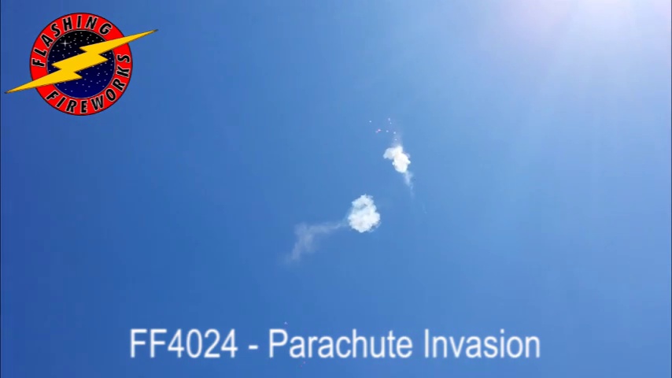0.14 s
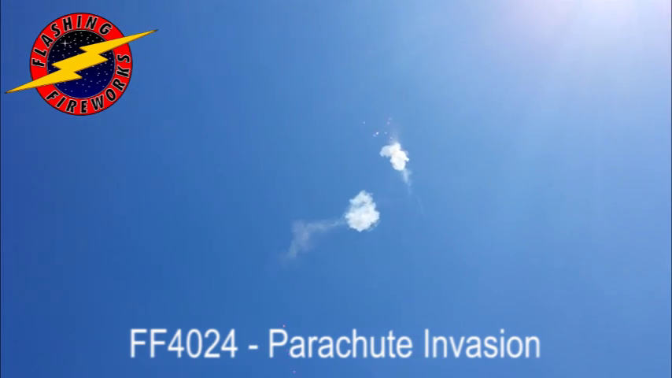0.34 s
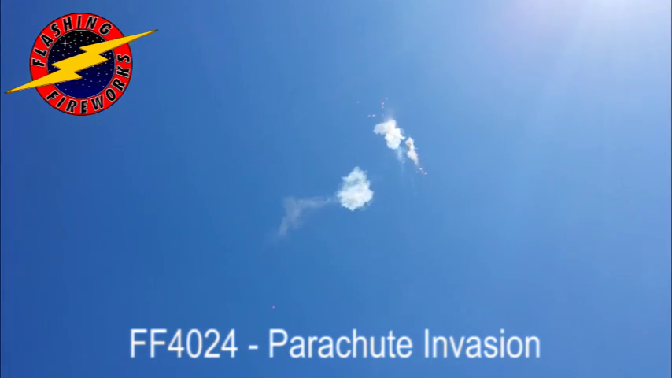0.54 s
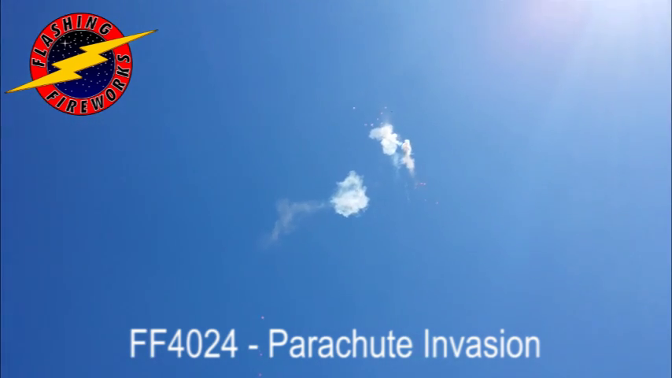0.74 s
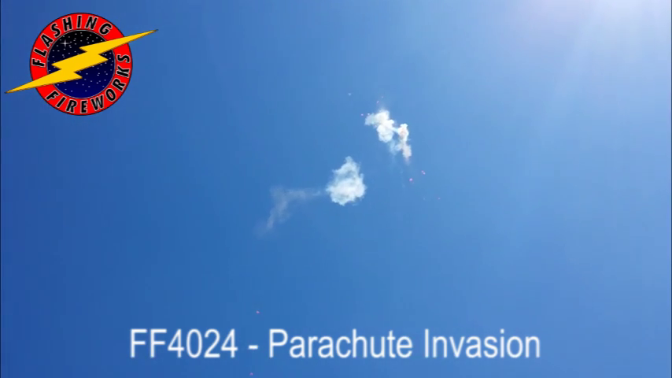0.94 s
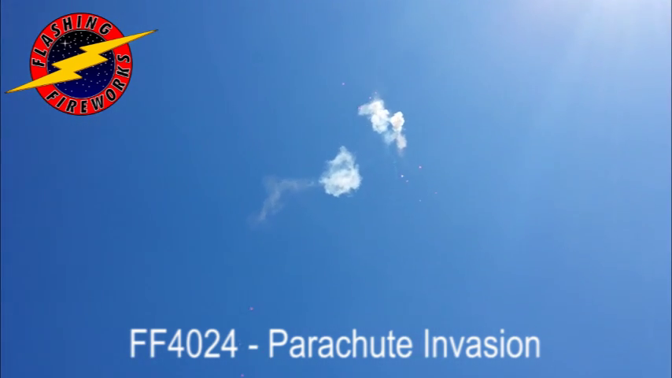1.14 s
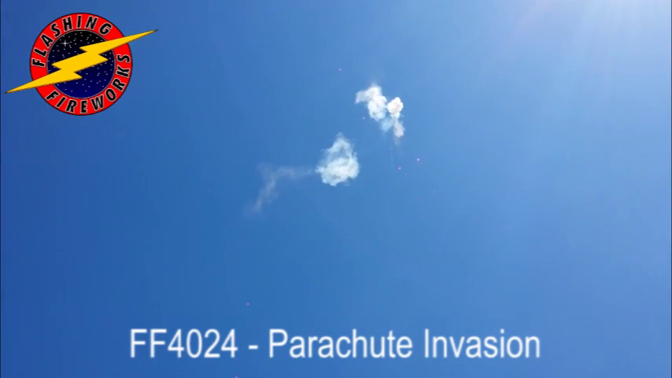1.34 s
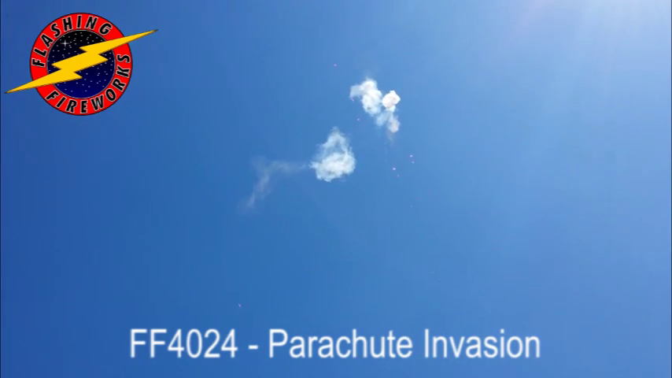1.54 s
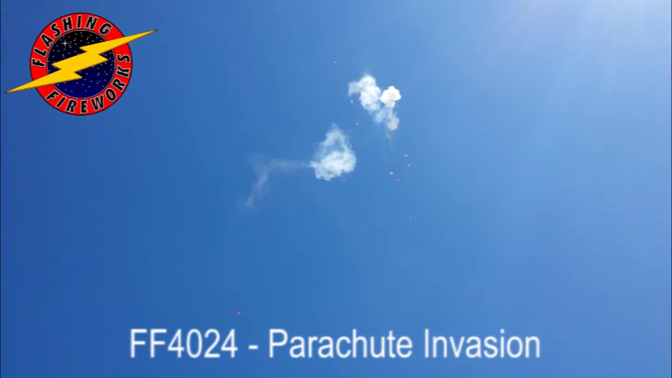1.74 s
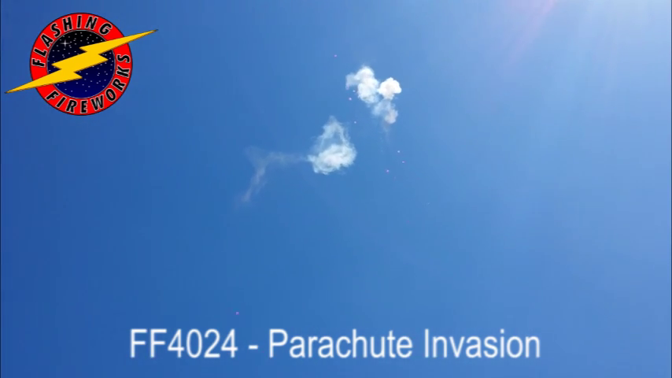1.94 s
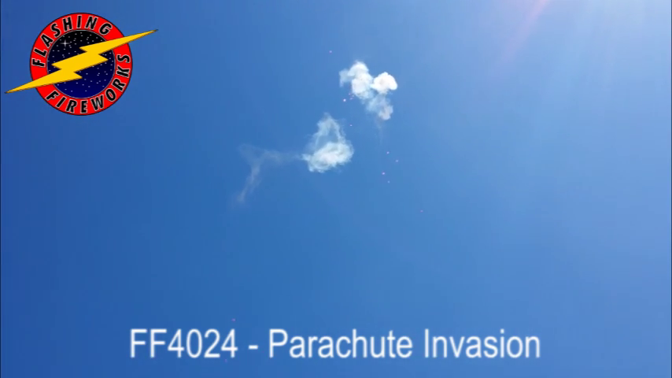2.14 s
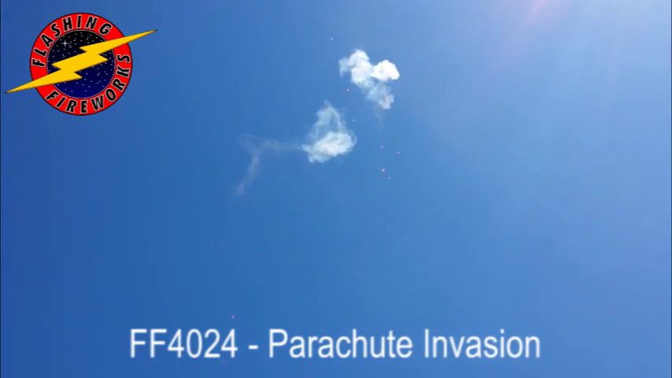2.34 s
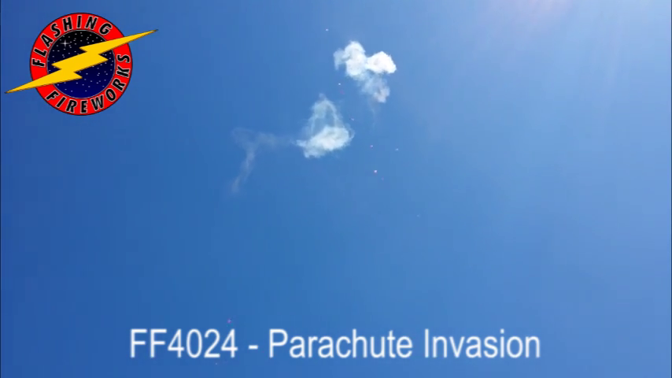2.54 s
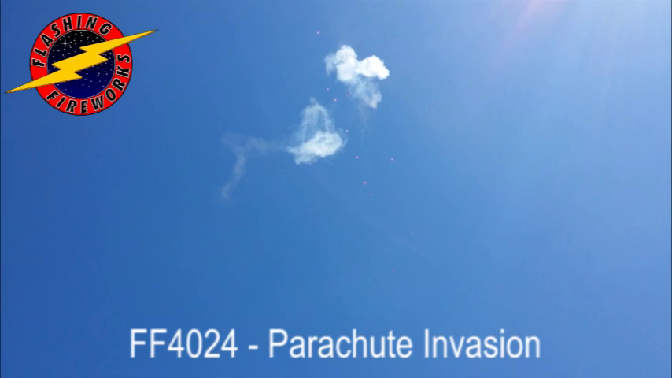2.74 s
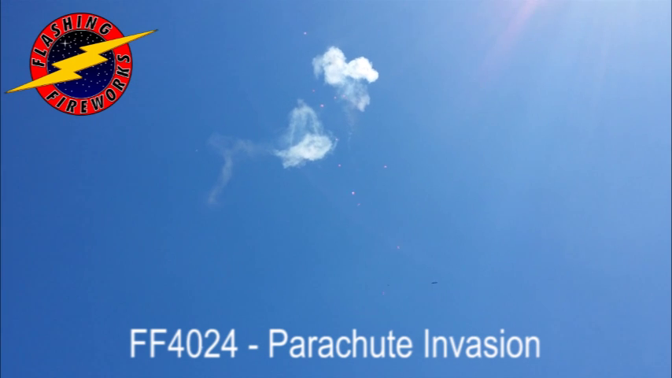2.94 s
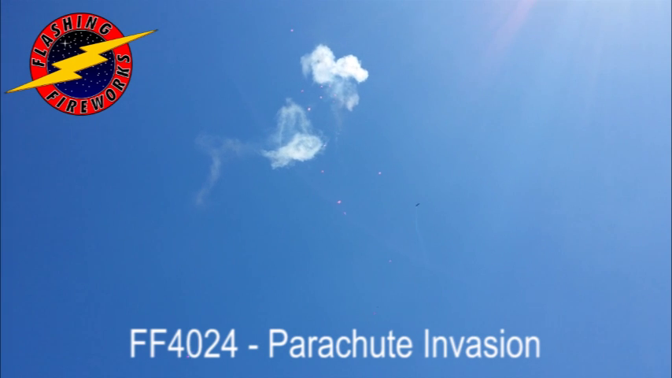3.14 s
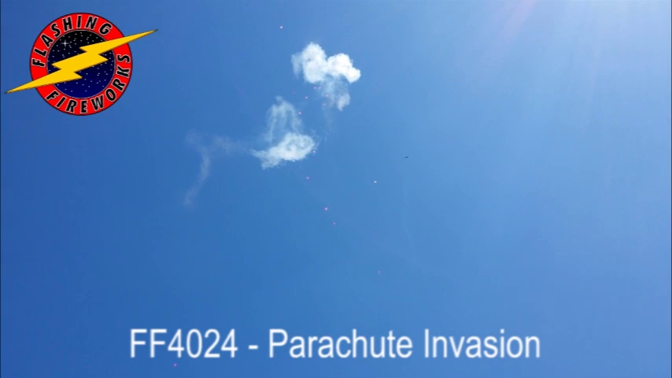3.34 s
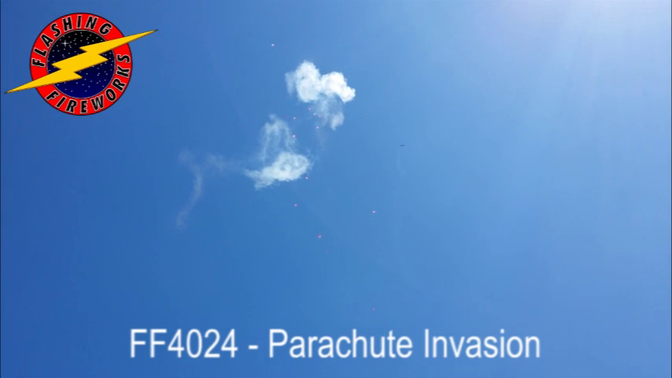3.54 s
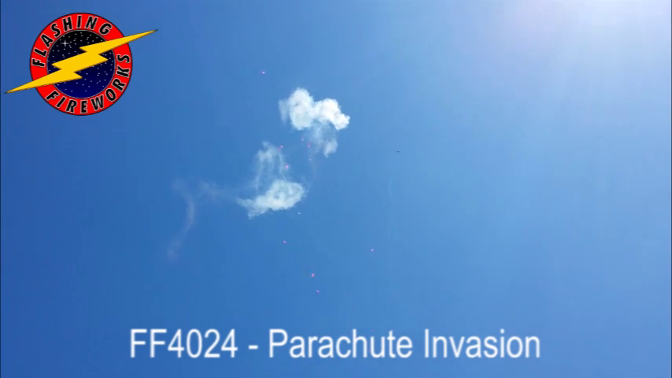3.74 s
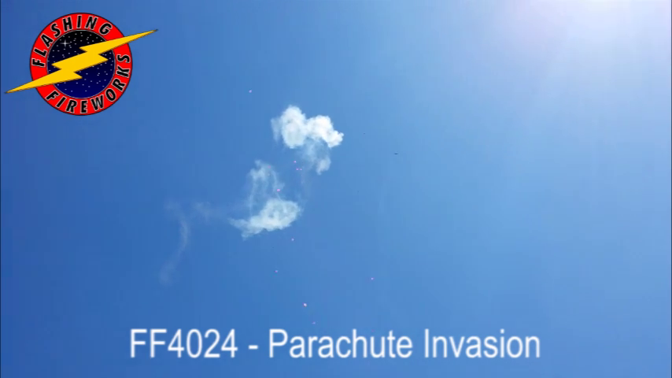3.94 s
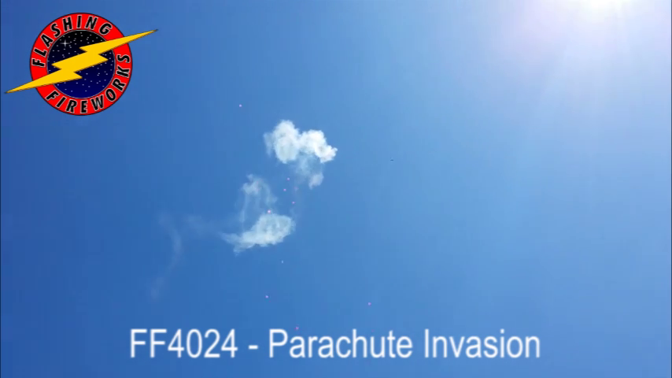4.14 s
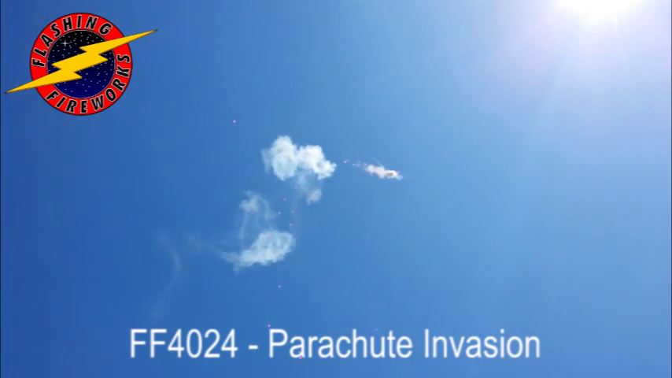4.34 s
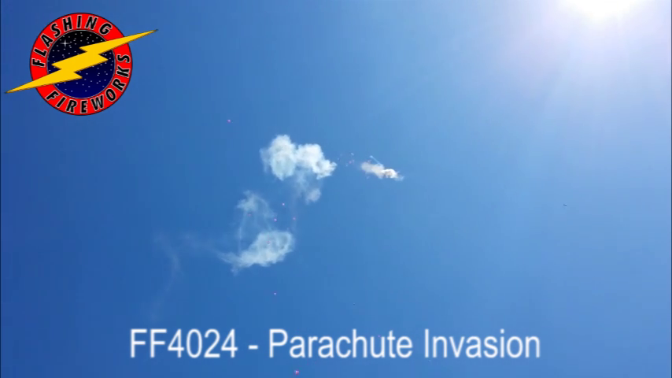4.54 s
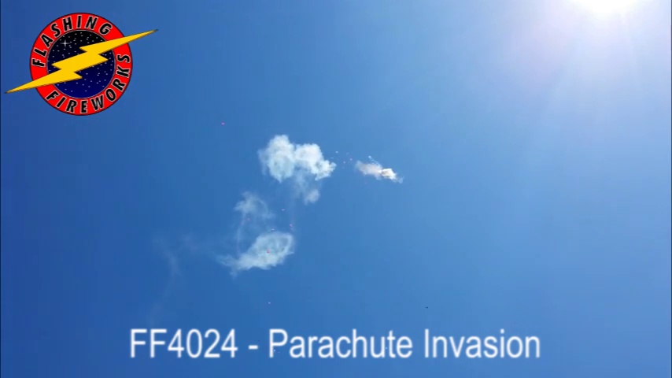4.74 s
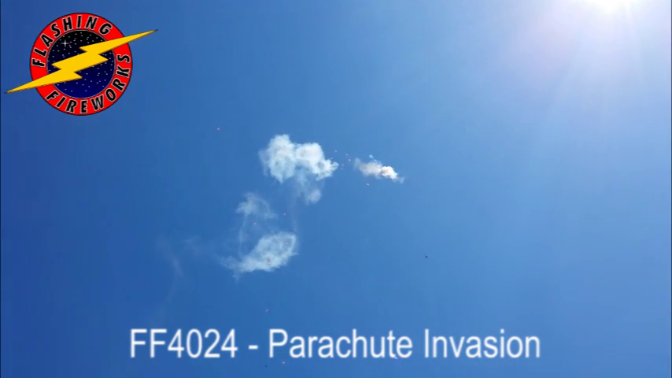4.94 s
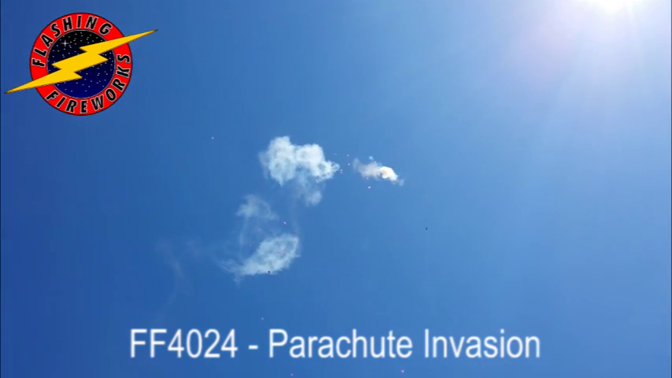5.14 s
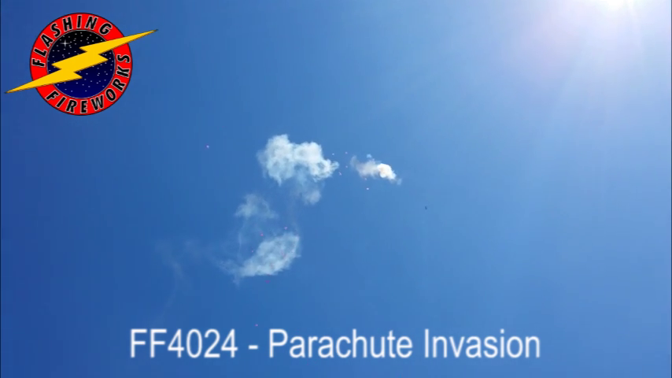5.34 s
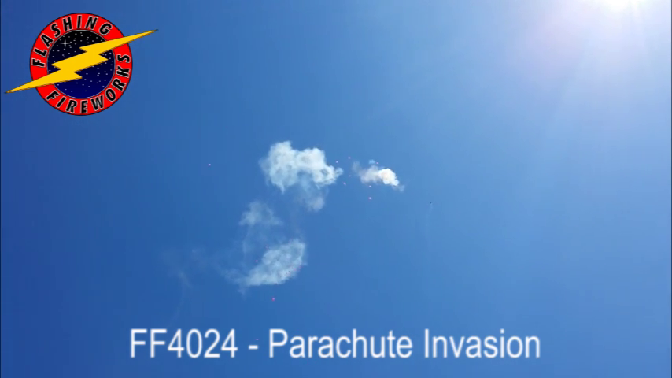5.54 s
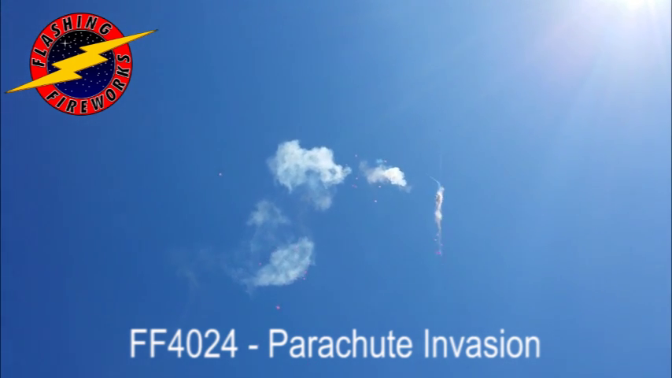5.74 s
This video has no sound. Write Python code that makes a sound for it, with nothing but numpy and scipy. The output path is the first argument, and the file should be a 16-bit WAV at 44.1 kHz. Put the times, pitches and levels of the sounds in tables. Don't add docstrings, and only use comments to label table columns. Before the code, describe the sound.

Outdoors in a wide field, a camera hears five firework shots: a loud central crack, a dull ground thump with a short jet hiss on the left, a quick pair of thump and lighter crack, then a strong closing crack. Each bounces off ground and distant trees with a noisy decaying tail. Between them the background dips and climbs back, revealing traffic rumble, airy hiss, wind-borne knocks and small chirping birds.

```python
import sys
import numpy as np
from scipy import signal
from scipy.fft import rfft, irfft, next_fast_len
from scipy.io import wavfile
from scipy.ndimage import uniform_filter1d

SR = 44100
rng = np.random.default_rng(int(sys.argv[2]) if len(sys.argv) > 2 else 0)


def ratio_of_db(decibels):
    return 10 ** (np.asarray(decibels, float) / 20)


def to_wav(sig):
    pcm = np.clip(np.atleast_2d(sig), -1, 1) * 32767
    pcm = np.round(pcm).astype(np.int16)
    wavfile.write(sys.argv[1], SR, pcm.T)


N = 254898
TIME = np.arange(N) / SR
CENTRES = 42 * 2 ** np.arange(0, 8.6, .5)

# start in seconds, left, right, ground bounce and scatter levels in dB.
BURSTS = [
    (0.4157, 23, 21, 14, -22.5),
    (4.2200, 14, 3, 5, -32.5),
    (5.6443, 19.5, 22, 8, -25),
]
# start in seconds, left, right, ground bounce and scatter levels in dB.
LIFTS = [
    (2.3767, 13.5, 7.5, -4, -23),
    (4.0245, 9.5, 14, -3.5, -28),
]


def add(out, s, x):
    i = int(round(s * SR))
    out[..., i:i + x.shape[-1]] += x[..., :max(N - i, 0)]


def pole_pair(x, hz, q, kind):
    w = 2 * np.pi * hz
    top = {"low": [w * w], "band": [w / q, 0], "high": [1, 0, 0]}[kind]
    return signal.lfilter(*signal.bilinear(top, [1, w / q, w * w], SR), x)


def on_log(hz, table, column=1):
    table = np.array(table, float)
    return np.interp(np.log(hz), np.log(table[:, 0]), table[:, column])


def walk(rate, size=N):
    hold = int(SR / rate)
    steps = np.repeat(rng.standard_normal(N // hold + 1), hold)[:size]
    return 1.3 * uniform_filter1d(uniform_filter1d(steps, hold), hold)


def lean(db):
    return np.array([[db], [-db]]) / 2


def ports(mid, side, hz):
    # frequency in Hz, unshared minus shared sound in dB.
    width = [(60, -15), (200, -16), (400, -11), (700, -7), (1200, -3), (1700, 0), (15000, 0)]
    share = ratio_of_db(on_log(hz, width))
    return np.array([np.roll(mid + share * side, 12), mid - share * side])


def band(hz, size, colour=((20, 0), (20000, 0))):
    full = next_fast_len(size)
    f = np.maximum(np.arange(full // 2 + 1) * SR / full, 1)
    bell = np.cos(np.pi / 2 * np.clip(2 * np.log2(f / hz), -1, 1))
    shape = bell * ratio_of_db(on_log(f, colour))
    mid, side = irfft(shape * rfft(rng.standard_normal((2, full))), full)[:, :size]
    return ports(mid, side, hz) / np.std(mid)


def puff(hz, width_hz, db, length):
    t = TIME[:int(length * SR) + 1024]
    mid, side = pole_pair(rng.standard_normal((2, 8192)), hz, hz / width_hz, "band")
    x = ports(mid, side, hz)[:, -len(t):] / np.std(mid)
    return ratio_of_db(db) * x * np.exp(-np.maximum(t - length, 0) / (.00025 + .08 * length))


def puffs(rows, lean_db, size_db, s):
    out = np.zeros((2, N))
    for delay, hz, width_hz, db, length in rows:
        add(out, s + delay, puff(hz, width_hz, db + size_db + lean(lean_db), length))
    return out


def gain_dip():
    depth_db = [-13.5, -14, -12, -11, -14.5, -10.5]
    earlier_shot_s, fall_s, hold_s, climb_db_per_s = -1.126, .08, 0.87, 23
    since = TIME - np.array([[earlier_shot_s]] + [row[:1] for row in BURSTS + LIFTS])
    down = np.array(depth_db)[:, None] * np.clip(since / fall_s, 0, 1)
    climb = climb_db_per_s * np.maximum(since - hold_s, 0)
    return np.minimum(down + climb, 0).min(axis=0)


def air():
    # level in dB at full gain, share of each gain dip it follows.
    layers = [
        (-48, 0.86),
        (-47.5, 0.92),
        (-58, 0.64),
        (-67, 1.3),
    ]
    flutters_db = (2.5, 2.5, .6, .6)
    # frequency in Hz, density in dB per Hz.
    colour = [(24, -27.5), (58, -5.5), (101, 0), (256, -8), (646, -4), (1720, -16), (4460, -20),
              (16000, -35.5)]
    dip_db = uniform_filter1d(gain_dip(), size=4000)
    group = np.searchsorted((370, 1500, 8000), CENTRES)
    out = 0
    for k, ((db, share), flutter_db) in enumerate(zip(layers, flutters_db)):
        centres, shared = CENTRES[group == k], walk(14)
        weight = ratio_of_db(on_log(centres, colour)) * np.sqrt(centres)
        for hz, w in zip(centres, weight / np.sqrt(np.sum(weight ** 2))):
            flutter = .7 * shared + .7 * walk(25)
            level_db = db + share * dip_db + flutter_db * flutter
            out = out + w * ratio_of_db(level_db) * band(hz, size=N, colour=colour)
    return out


def knocks():
    # start in seconds, peak level in dB, pitch in Hz.
    bumps = [(0.148, -37, 646), (0.251, -33, 700), (0.35, -39.5, 746), (1.494, -39, 633), (1.647, -40, 605),
             (1.757, -37.5, 514), (1.88, -39, 705), (1.989, -34, 756), (2.04, -34, 606),
             (2.296, -30.5, 580), (3.676, -39, 808), (5.434, -39.5, 650), (5.489, -45, 937)]
    out = np.zeros((2, N))
    fade = np.exp(-TIME[:int(.025 * SR) + 1024] / .02)
    for s, db, hz in bumps:
        add(out, s, puff(hz, .25 * hz, db - 5, .025) * fade)
    return out


def blast(wave, top_hz, far=False):
    push, fade, hz, q, second_hz, second_q = wave
    if far:
        second_hz = np.clip(.48 * top_hz, second_hz, 500)
    t = TIME[:2048] / push
    x = pole_pair((1 - t) * np.exp(-fade * t), hz, q, "high")
    x = pole_pair(x, second_hz, second_q, "high")
    return pole_pair(x, min(top_hz, .45 * SR), .7, "low")


def swing(hz, db, t60):
    t = TIME[:8192]
    return ratio_of_db(db - 60 * t / t60) * np.sin(2 * np.pi * hz * t)


def scatter(table, far_db, rise=0.002):
    t, out, crackle = TIME[:SR], 0, 2.0 * walk(500, size=SR)
    for hz in CENTRES:
        db, t60, late_db, late_t60 = (on_log(hz, table, column=k) for k in range(1, 5))
        early = ratio_of_db(db - 60 * t / t60 + crackle)
        late = ratio_of_db(late_db + far_db - 60 * t / late_t60)
        out = out + np.hypot(early, late) * ratio_of_db(1.5 * walk(60, size=SR)) * band(hz, size=SR)
    return out * (1 - np.exp(-t / rise))


def echo_field(out, s, wave, echoes, tail_db):
    for delay, db, top_hz, lag, rustle_db in echoes:
        db = db + .4 * (tail_db + 20)
        rustle_db = rustle_db + .6 * (tail_db + 13)
        echo = ratio_of_db(db) * blast(wave, top_hz, far=True)
        add(out[0], s + delay + lag, echo)
        add(out[1], s + delay, echo)
        rustle = puff(top_hz, top_hz, rustle_db, .004 + .015 * delay)
        add(out, s + delay, pole_pair(rustle, 1.5 * top_hz, .7, "low"))


def shots(kind, rows, wave, fizzes, rings, echoes, tail, tail_waits):
    diaphragm = {"burst": (72, -18, .07), "lift": (60, -14, .06)}
    bounces_s = {"burst": .0108, "lift": .0053}
    ring_lean_db = {"burst": -0.5, "lift": -8.5}
    out, bounce = np.zeros((2, N)), bounces_s[kind]
    for (s, left_db, right_db, bounce_db, tail_db), fizz in zip(rows, fizzes):
        add(out, s, ratio_of_db(np.array([[left_db], [right_db]])) * blast(wave, 15000))
        add(out, s, puff(*fizz))
        add(out, s + 0.01, swing(*diaphragm[kind]))
        add(out, s + bounce, ratio_of_db(bounce_db) * blast(wave, .0017 / wave[0] ** 2))
        far_db = (.45 - 1) * (tail_db + 22.5)
        add(out, s + tail_waits * bounce, ratio_of_db(tail_db) * scatter(tail, far_db))
        out += puffs(rings, ring_lean_db[kind], 0.69 * (tail_db + 13.5), s)
        echo_field(out, s, wave, echoes, tail_db)
    return out


def bursts():
    wave = (0.00098, 0.34, 96, 0.77, 215, 0.17)
    # centre in Hz, width in Hz, level in dB, length in seconds.
    fizzes = [
        (3300, 7100, -16.5, 0.0039),
        (2540, 5500, -20.5, 0.0015),
        (3300, 1700, -16.5, 0.0019),
    ]
    # delay in seconds, centre in Hz, width in Hz, level in dB, length in seconds.
    rings = [
        (-.0065, 3300, 6000, -30, .006),
        (.002, 2314, 1493, -15, .0016),
        (0.0092, 2192, 2009, -7.5, .0015),
        (0.2104, 363, 400, -28.5, .02),
    ]
    # delay in seconds, level in dB, top in Hz, left lag in seconds, rustle level in dB.
    echoes = [(.0066, -10, 6000, 0, -20), (.186, -30, 5000, .0002, -44), (.2108, -15, 2500, .0001, -38),
              (.2272, -19, 4000, 0, -41), (.197, -32, 4000, 0, -46), (.338, -38, 2200, 0, -50),
              (.368, -34, 2500, 0, -48), (.366, -44, 6500, 0, -52), (.473, -36, 2000, 0, -54)]
    # Hz, level in dB, t60 in seconds, late level in dB, late t60 in seconds.
    tail = [(59.5, -25, 0.083, -62, 1.7), (181, -18.5, 0.31, -34, 2.5), (427, -2, 0.13, -15.5, 0.4),
            (990, -3.5, 0.29, -23.5, 1.3), (2240, -1, 0.18, -22.5, 1.13), (4000, -4.5, 0.28, -20, 1),
            (7800, -2.5, 0.27, -23.5, 0.89), (13940, -12, 0.16, -38, .6)]
    return shots("burst", BURSTS, wave, fizzes, rings, echoes, tail, tail_waits=1)


def birds():
    # start in seconds, length in seconds, pitch in Hz, level in dB, left minus right in dB.
    tweets = [(1.707, .033, 4150, -65, 0), (1.832, .04, 5950, -70, 12), (2.091, .042, 4240, -54, 5),
              (2.185, 0.033, 4450, -52.5, -5), (2.286, 0.047, 4200, -52, -2),
              (3.016, .021, 4220, -66.5, 8.5), (3.981, 0.022, 3956, -54, -4), (5.588, .023, 4200, -55, -7)]
    cheeps = [(1.79, .022, 4900, -61, 3), (1.973, .013, 4900, -59, 4), (2.022, .036, 6250, -62, 5),
              (2.3, .035, 1640, -56, 0), (2.652, .017, 6100, -66, 10), (2.655, .022, 3050, -52, -7),
              (2.932, .022, 3250, -67, 6), (3.542, .014, 1430, -53, 0), (3.554, .018, 1400, -51, -7)]
    squeaks = [(.75, .011, 2050, -53, -5), (1.434, .045, 2370, -55, 8), (1.436, .023, 930, -55, -3),
               (1.456, .018, 7000, -63, 12), (1.458, .016, 2340, -52, 13), (2.1, .021, 3650, -59, -2),
               (2.119, .015, 2680, -54, -9), (2.692, .035, 2570, -60, -2), (5.15, .012, 1750, -61, 6.5)]
    whistles = [
        (1.5, .33, 6650, -75, 6),
        (1.74, .3, 6020, -67, 10),
    ]
    glides = {"tweet": 1.06, "cheep": .91, "squeak": .98}
    calls = [(tweets, glides["tweet"]), (cheeps, glides["cheep"]), (squeaks, glides["squeak"]), (whistles, .875)]
    out = np.zeros((2, N))
    for rows, glide in calls:
        for s, length, hz, db, pan_db in rows:
            n = int(length * SR)
            drift = uniform_filter1d(rng.standard_normal((2, 16384)), 90)
            waver, rough = drift[:, :n] * np.sqrt(90)
            pitch = np.linspace(hz, glide * hz, n) * (1 + 0.01 * waver * np.minimum(1, 0.083 / length))
            swell = np.sqrt(np.hanning(n)) * np.maximum(1 + .8 * rough, 0)
            tone = np.sin(2 * np.pi * np.cumsum(pitch) / SR) * swell
            add(out, s, ratio_of_db(db + 1.5 + lean(pan_db)) * tone)
    return out


def lifts():
    wave = (.0012, .34, 142, 1.3, 240, .68)
    # centre in Hz, width in Hz, level in dB, length in seconds.
    fizzes = [
        (7095, 1200, 6, 0.0016),
        (8500, 830, -4, .0021),
    ]
    # delay in seconds, centre in Hz, width in Hz, level in
    # dB, length in seconds.
    rings = [(-.013, 5060, 4000, -42.5, .009), (-.0049, 2310, 4000, -19, 0.0012),
             (-.0043, 2977, 6000, -31.5, .0038), (.0007, 2502, 1518, -5, 0.0026),
             (.0046, 1801, 3013, -17, .013), (.0064, 6000, 5000, -7.5, .0011),
             (.0085, 351.7, 159.5, -5, .009)]
    # delay in seconds, level in dB, top in Hz, left lag in seconds, rustle level in dB.
    echoes = [(0.0106, 1, 772, -.0006, -17.5), (.066, -11, 700, 0, -37), (0.2495, -6.5, 533, -.0001, -42),
              (0.297, -24, 400, 0, -60), (.385, -29, 500, 0, -54), (0.414, -56, 4960, 0, -51),
              (.479, -35, 700, 0, -69), (.80, -31, 348, 0, -64), (0.919, -25.5, 800, .0004, -46),
              (0.9863, -16, 900, .0005, -55)]
    # Hz, level in dB, t60 in seconds, late level in dB, late t60 in seconds.
    tail = [(55, -12, 0.16, -44.5, 0.6), (149, -9, 0.39, -31.5, 2.2), (320, 3.5, 0.22, -15, 1.1),
            (900, 1, 0.32, -19, 0.43), (1715, -4, 0.15, -31, 0.78), (6000, -5, 0.3, -34.5, 0.36),
            (11620, -13, 0.13, -40, .5), (15000, -19.5, .2, -59.5, 0.89)]
    return shots("lift", LIFTS, wave, fizzes, rings, echoes, tail, tail_waits=0.54)


def shells():
    jet = (5300, 10000, [-35, -46.5], .122)
    hz, width_hz, levels_db, stop_s = jet
    length = stop_s - .02
    thump_s, right_lag_s = .0031, .0007
    climb_away = np.exp(-TIME[:int(length * SR) + 1024] / 0.14)
    out = np.zeros((2, N))
    for row, db in zip(LIFTS, levels_db):
        thump = -swing(hz=118, db=5, t60=.024)
        add(out[0], row[0] + thump_s, thump)
        add(out[1], row[0] + thump_s + right_lag_s, thump)
        add(out, row[0] + 0.0084, puff(hz, width_hz, db, length) * climb_away)
    return out


def dry_rustle():
    # start in seconds, centre in Hz, width in Hz, level in dB, length in seconds.
    scrapes = [
        (5.372, 10940, 7000, -63.5, 0.029),
    ]
    return puffs(scrapes, 0, 0, 0)


def scene():
    return air() + knocks() + bursts() + birds() + lifts() + shells() + dry_rustle()


def roll_off(x):
    return signal.sosfilt(signal.butter(12, 16410, fs=SR, output="sos"), x)


def record(dry):
    # frequency in Hz, Q, added band level in dB.
    capsule = [(2450, 3.5, -7), (6600, 5.5, -6)]
    # start in seconds, length in seconds, top in Hz.
    stunned = (2.3855, .016, 200)
    dry = signal.sosfilt(signal.butter(4, 55, "high", fs=SR, output="sos"), dry)
    dry = dry + sum(ratio_of_db(db) * pole_pair(dry, hz, q, "band") for hz, q, db in capsule)
    s, length, top_hz = stunned
    clear = np.interp(TIME, [s - .001, s, s + .6 * length, s + 1.4 * length], [1, 0, 0, 1])
    bass = signal.sosfiltfilt(signal.butter(3, top_hz, fs=SR, output="sos"), dry[0])
    x = np.array([bass + clear * (dry[0] - bass), dry[1]])
    clipped = np.clip(x, -.9, .9)
    mix = signal.sosfilt(signal.ellip(6, .2, 50, 16000, fs=SR, output="sos"), clipped)
    return roll_off(mix)


dry = scene()
out = record(dry)
to_wav(out)
```